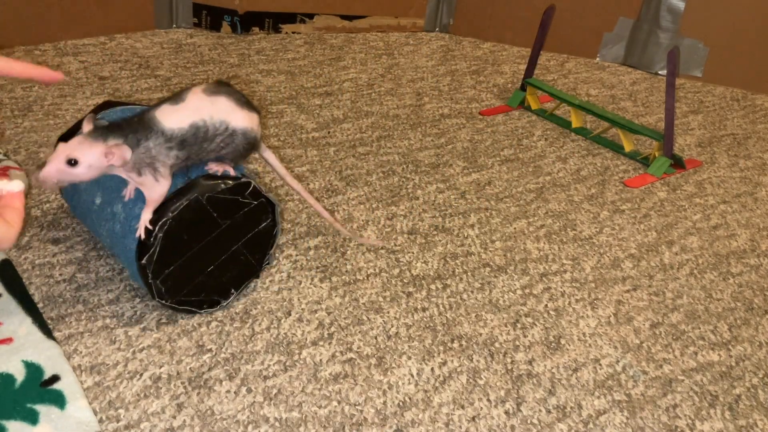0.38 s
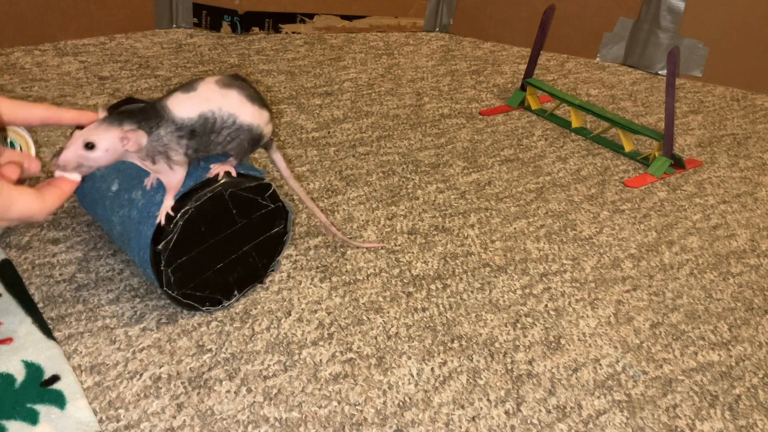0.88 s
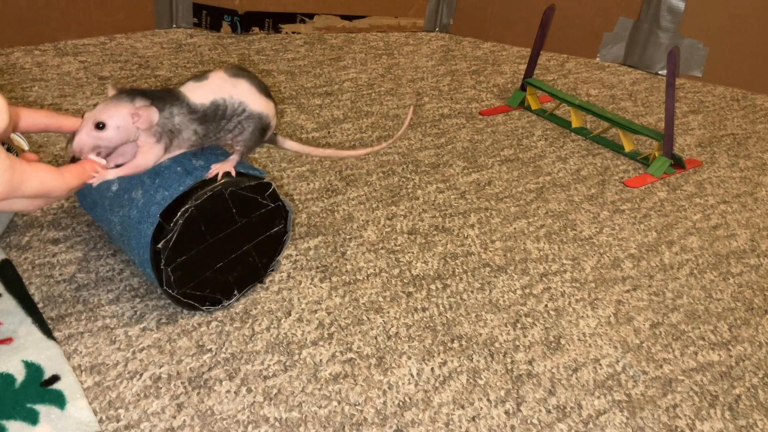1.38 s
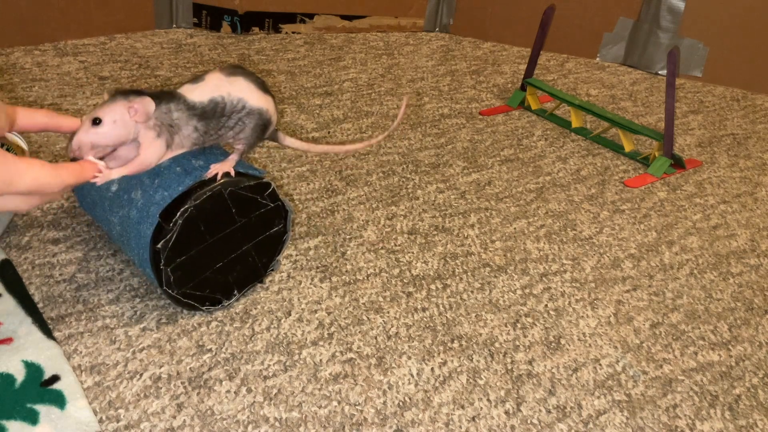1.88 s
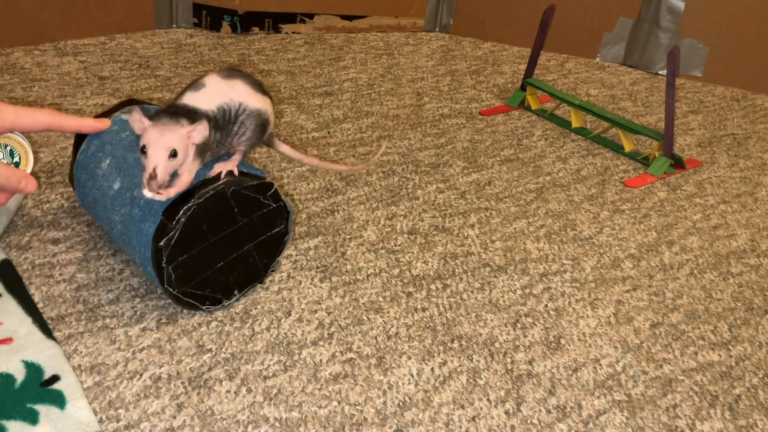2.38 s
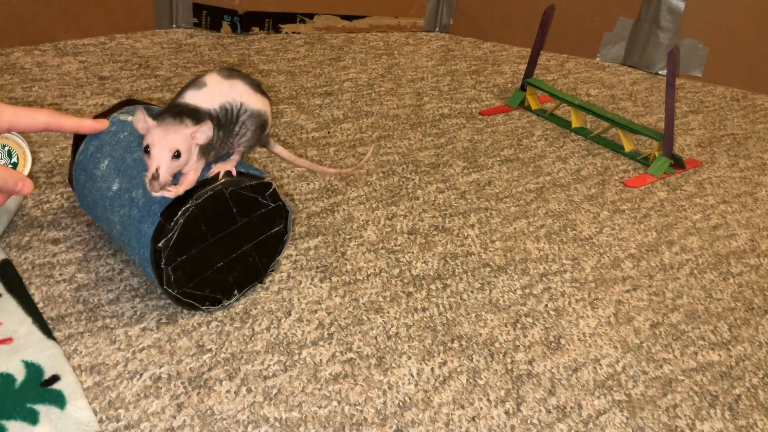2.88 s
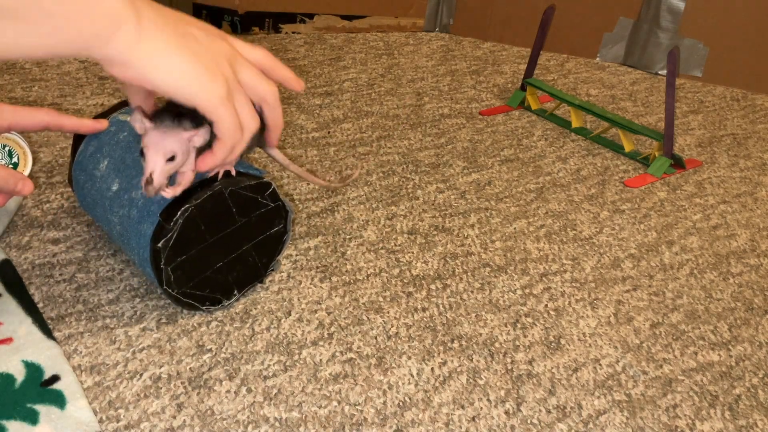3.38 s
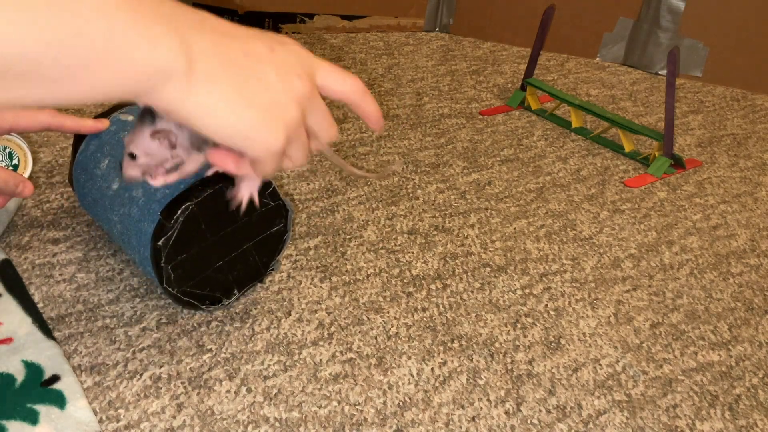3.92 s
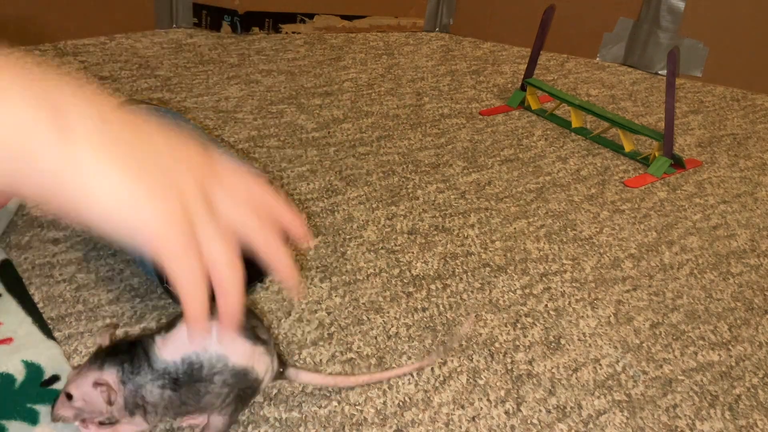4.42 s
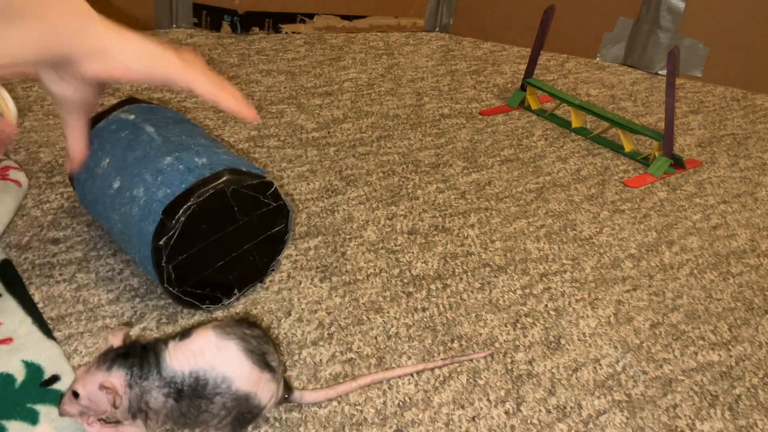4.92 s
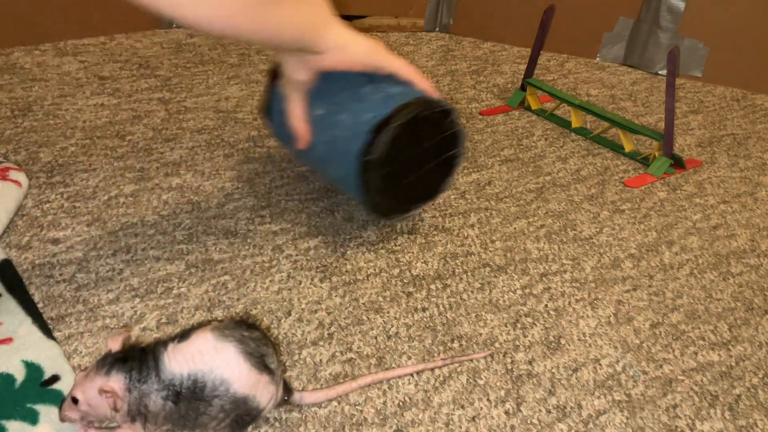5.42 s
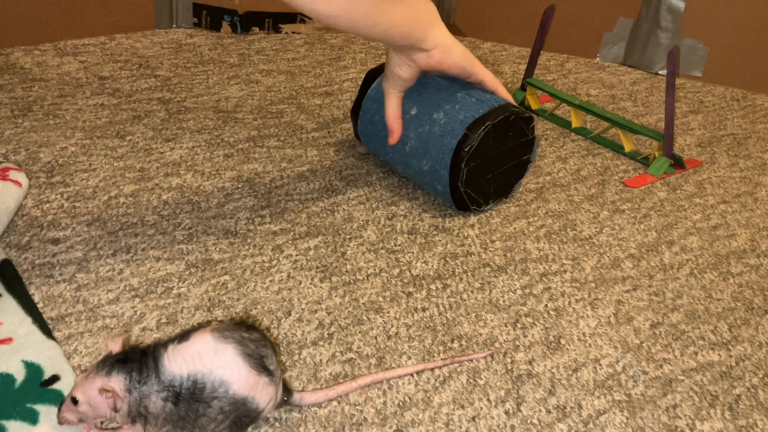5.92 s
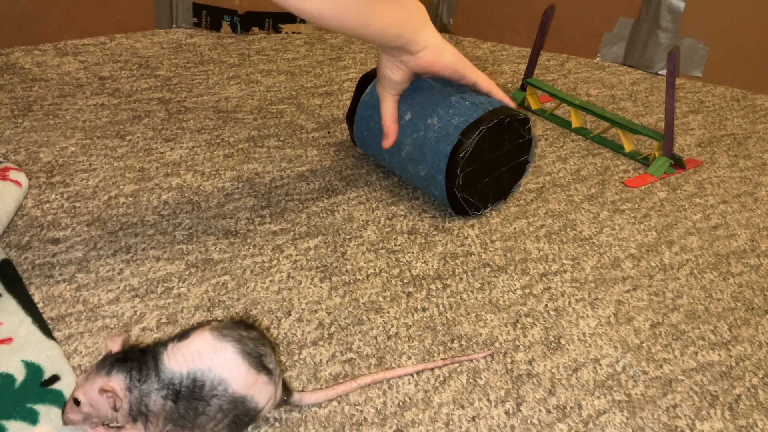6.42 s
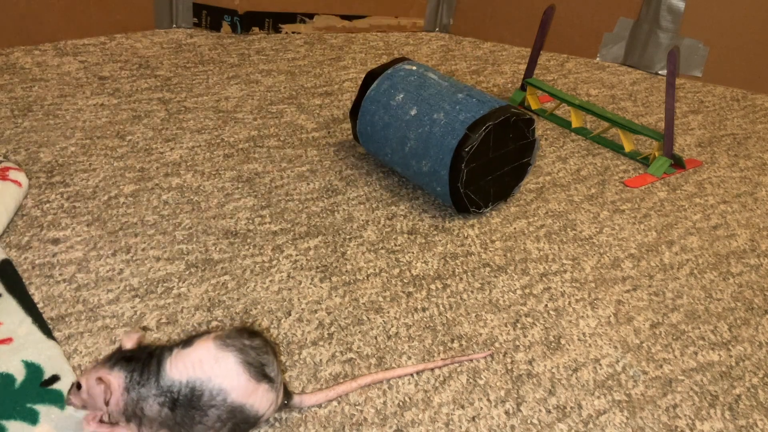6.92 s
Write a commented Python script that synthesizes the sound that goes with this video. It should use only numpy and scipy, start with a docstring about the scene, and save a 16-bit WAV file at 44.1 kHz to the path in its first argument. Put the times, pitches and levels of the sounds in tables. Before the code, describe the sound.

Close stereo pickup in a small carpeted room: a pet rat scuffles on a fabric-covered barrel, soft rustles and faint claw ticks. A sudden knock and quick scrape jolt the barrel, followed by cloth hiss and a quiet lull. Hands then move the barrel with rustles, knocks and a soft set-down, and two hard hollow taps finish. A faint motor hum and room noise lie underneath.

```python
"""A small rat scuffles on a cloth-covered barrel on a carpet while hands and sleeves move around it.
Cloth, fur and shifting weight are flickering noises that swell; claws tick as short rings with sharp edges.
The barrel is knocked (struck modes) and scraped (noise through its resonances), once quickly and once softly.
Two hard taps ring near the end; a faint motor hum of drifting sines and noisy room tone lie below.
The two channels share part of the sound, with balance and phase that vary over frequency."""
import sys
import numpy as np
from scipy import signal
from scipy.fft import rfft, irfft, next_fast_len
from scipy.io import wavfile

SR = 44100
rng = np.random.default_rng(int(sys.argv[2]) if len(sys.argv) > 2 else 0)


def rack_gain(trim_db):
    """Turn a fader trim in dB into the linear factor to multiply a signal by."""
    fader = np.asarray(trim_db, float)
    return 10 ** (fader / 20)


def transcribe(signal):
    """Save signal, clipped to [-1, 1], as a 16-bit WAV file at the path in sys.argv[1]."""
    frames = np.atleast_2d(signal).T
    limited = np.clip(frames, -1, 1)
    pcm = np.round(limited * 32767).astype(np.int16)
    wavfile.write(sys.argv[1], SR, pcm)


N = 310851
SIZE = next_fast_len(N + SR)  # room for tails behind the scene
HZ = np.maximum(np.arange(SIZE // 2 + 1) * SR / SIZE, 1)


def rms_one(x):
    """Scale to unit rms."""
    return x / np.sqrt(np.mean(x ** 2) + 1e-20)


def over_hz(rows):
    """Columns of a spectrum at every frequency bin, interpolated over log frequency."""
    hz, *columns = np.transpose(rows)
    return [np.interp(np.log(HZ), np.log(hz), c) for c in columns]


def shaped(x, gain):
    """Filter by a gain for each frequency bin."""
    return irfft(rfft(x, SIZE) * gain, SIZE)[..., :N]


def drift(rate_hz):
    """Slow random wander of unit rms: noise through two equal low-pass poles at the rate."""
    # computed at every 40th sample, then interpolated
    r = np.exp(-80 * np.pi * rate_hz / SR)
    noise = rng.standard_normal(N // 40 + 2002)
    slow = signal.lfilter([1], [1, -2 * r, r * r], noise)[2000:]
    return np.interp(np.arange(N) / 40, np.arange(len(slow)), rms_one(slow))


def swells(s, peak_db, rise_s, fall_s, rest_db, fade=1):
    """Level in dB of overlapping swells; each is 10 * fade dB down a rise before and a fall after its peak."""
    curve = 1.23  # 1 = level slides evenly in dB, 2 = round top and steep skirts
    t = np.arange(0, N, 16)[:, None] / SR - s
    before, after = -t / np.maximum(rise_s, 1e-4), t / np.maximum(fall_s, 1e-4)
    away = np.where(t < 0, before, after)
    drop_db = np.minimum(10 * fade * away ** curve, 200)
    power = np.sum(rack_gain(2 * (peak_db - drop_db)), axis=1) + rack_gain(2 * rest_db)
    return np.interp(np.arange(N), np.arange(0, N, 16), 10 * np.log10(power))


def friction(spectrum, level_db, flicker_db, snap_db, snaps_per_s):
    """Two unrelated draws of fibre noise (direct, scattered) that flickers and carries lone snaps."""
    snap_height = rack_gain(snap_db + 4.45 * np.minimum(rng.exponential(1, N), 2.6))
    snaps = (rng.random(N) < snaps_per_s / SR) * snap_height
    noise = rng.standard_normal((2, N)) * rack_gain(flicker_db * drift(21.3))
    noise = noise + snaps * rng.choice([-1, 1], (2, N))
    return rack_gain(level_db) * rms_one(shaped(noise, rack_gain(over_hz(spectrum)[0])))


def ring(x, hz, t60):
    """A resonator: a unit click sets a sine of height 1 ringing, 60 dB down after t60 seconds."""
    r, w = rack_gain(-60 / (t60 * SR)), 2 * np.pi * hz / SR
    return signal.lfilter([0, np.sin(w)], [1, -2 * r * np.cos(w), r * r], x + 1e-18)


def struck(at, hz, t60, contact_cycles, length):
    """A mode pushed at its own pitch for the few cycles that the contact lasts; height about 1."""
    push = np.hanning(round(contact_cycles * SR / hz) + 3)[1:-1]
    wave = np.cos(2 * np.pi * hz * np.arange(len(push)) / SR)
    touch = np.zeros(length)
    touch[at:at + len(push)] = 2 * push / np.sum(push) * wave
    return ring(touch, hz, t60)


def blows(events, spread, fall_db, count, smear_s):
    """Each blow rings its pitch and loose neighbours, fall_db weaker an octave away, starting a little apart."""
    out, length = np.zeros(N + SR), SR // 4
    chance = rng.random((len(events), 2, 2 * count + 1))
    for (s, peak_db, hz, cycles, contact), (offs, lates) in zip(events, chance):
        ratios = spread ** np.arange(-count, count + 1) + .08 * (offs - .5)
        sound = np.zeros(length)
        for k, late in zip(ratios, lates):
            t60 = max(cycles, 1) / (k * hz)
            mode = struck(int(late * smear_s * SR), min(k * hz, 19000), t60, contact * k, length)
            sound += rack_gain(-fall_db * abs(np.log2(k))) * mode
        at = round(s * SR)
        out[at:at + length] += rack_gain(peak_db) * sound / np.max(np.abs(sound))
    return out[:N]


def room(x):
    """Two unrelated tails of dying noise, dulled by the walls, starting after the first reflection."""
    t60_s, wall_cut_hz = .27, 10000
    t = np.arange(SR // 2) / SR
    tails = rng.standard_normal((2, len(t))) * rack_gain(-60 * t / t60_s) * (t > .003)
    tails = tails / np.sqrt(np.sum(tails ** 2, axis=1, keepdims=True))
    return shaped(x, rfft(tails, SIZE) / np.sqrt(1 + (HZ / wall_cut_hz) ** 2))


def ports(direct, scattered):
    """The two channels share part of the sound, nearly all above 8.3 kHz; the left one trails in phase."""
    # left against right channel: (frequency [Hz], likeness [0-1], left phase lead [rad], left over right [dB])
    channel_rows = [(80, .95, -.1, -.7), (250, .7, -.1, 1.0), (500, .6, -.2, 4.0), (750, .25, -.8, 7.0),
                    (1100, .45, -1.0, 3.0), (1500, .45, -1.0, 1.1), (2100, .75, -2.4, -3.0),
                    (2700, .93, -3.2, -1.1), (3300, .85, -4.5, -1.5), (3900, .92, -5.9, -1.1),
                    (4500, .97, -6.15, -1.1), (5200, .78, -5.8, -2.2), (5900, .85, -6.15, -2.5),
                    (7300, .75, -5.25, -1.1), (8300, .99, -6.2, 0), (16000, .985, -6.3, 0)]
    alike, lead, balance_db = over_hz(channel_rows)
    alike = np.clip(alike, 0, 1)
    shared, own = np.sqrt((1 + alike) / 2), np.sqrt((1 - alike) / 2)
    left = rack_gain(balance_db / 2) * np.exp(1j * lead)
    right = rack_gain(-balance_db / 2)
    return shaped(direct, [shared * left, shared * right]) + shaped(scattered, [own * left, -own * right])


def heard(dry, wet_db):
    """A struck or scraped sound and its room tails, spread over the two channels."""
    tails = rack_gain(wet_db) * room(dry)
    return ports(dry + tails[0], 2.12 * tails[1])


def room_tone():
    """Steady broad noise with a slight flicker."""
    # colour of the room: (frequency [Hz], relative density [dB])
    tone_colour = [(30, -57), (70, -7.5), (200, 5), (500, -3), (1000, -8), (2000, -12.5), (4000, -20.5),
                   (8000, -32), (15500, -24), (16500, -45)]
    return friction(tone_colour, -68.5, flicker_db=2.3, snap_db=-20, snaps_per_s=1)


def hum():
    """A motor hum of a few harmonics that drift in pitch and level, its fundamental stronger at the left."""
    # level of the hum as heard, which rises and falls: (time [s], level before drift [dB])
    hum_level = [(0, -64.5), (1.2, -65.5), (1.7, -74), (2.3, -67), (3.0, -70), (3.9, -67.5), (5.3, -62.5),
                 (6.0, -57.5), (7.05, -63)]
    # harmonics: (multiple of the pitch, relative left level [dB], relative right level [dB], left lead [rad])
    harmonics = [(1, -1, -3.5, 1.3), (2, -17, -13.5, 2.3), (3, -5.5, -7, 2.36), (5, -27, -20, 1.1)]
    s, db = np.transpose(hum_level)
    level_db = np.interp(np.arange(N) / SR, s, db)
    phase = 2 * np.pi * np.cumsum(254.7 + 1.596 * drift(5.9)) / SR  # pitch in Hz
    tones = np.zeros((2, N))
    for k, left_db, right_db, lead in harmonics:
        tones[0] += rack_gain(left_db) * np.sin(k * phase + lead)
        tones[1] += rack_gain(right_db) * np.sin(k * phase)
    return np.sqrt(2) * rack_gain(level_db + 3.24 * drift(8.8)) * tones


def taps():
    """Both hard taps crack and strike the same hollow modes with strengths of their own."""
    # moments of the two taps: (time [s])
    tap_times = [6.6247, 6.8073]
    # hollow modes of the tapped object: (frequency [Hz], t60 [s], first tap level [dB], second tap level [dB])
    modes = [(616, 0.026, -32, -28.5), (1240, 0.035, -26, -23), (1542, 0.074, -24.5, -57),
             (1626, 0.039, -20, -30), (1834, 0.01, -15, -13.5), (1913, 0.04, -31, -17.5),
             (2100, 0.013, -23, -53), (3080, 0.0024, -26, -19), (5700, 0.0086, -51, -39),
             (7060, 0.0089, -38, -39), (8360, 0.021, -42, -26.5), (8700, 0.013, -34, -42),
             (9030, 0.027, -41, -29), (9540, 0.015, -36, -30), (9800, 0.015, -27, -26),
             (10000, 0.01, -36, -22.5), (10700, 0.0054, -46, -38), (13800, 0.0031, -39, -31)]
    contact_s = 0.0014
    crack_levels_db, crack_decay_s = [-42, -36], .004
    t = np.arange(N) / SR
    cracks = np.zeros(N)
    for s, db in zip(tap_times, crack_levels_db):
        cracks += rack_gain(db) * (t >= s) * np.exp(-np.maximum(t - s, 0) / crack_decay_s)
    out = cracks * rng.standard_normal(N)
    for hz, t60, *levels_db in modes:
        for s, level_db in zip(tap_times, levels_db):
            out += rack_gain(level_db) * struck(round(s * SR), hz, t60, contact_s * hz, N)
    return out


def leaning_taps():
    """The taps in the room, tilted mostly to the left by a balance that varies over frequency."""
    # extra balance of the taps: (frequency [Hz], left over right [dB])
    balance_rows = [(300, 1), (800, 2), (1100, -1), (1500, 4), (2000, 7.5), (2300, 1.5)]
    lean = rack_gain(over_hz(balance_rows)[0] / 2)
    return shaped(heard(taps(), wet_db=-6.0), np.array([lean, 1 / lean]))


def scrape():
    """Dense slips excite the resonances of the barrel wall; a soft contact hardly reaches the high ones."""
    # wall resonances: (frequency [Hz], width before widening by 1.1 [Hz], relative level [dB])
    resonances = [(678, 58, 3.5), (1019, 14, 11.5), (1240, 29, 6), (2020, 100, 3.5), (3870, 58, -12),
                  (4200, 66, 2), (5000, 72, -5), (5070, 44, -6)]
    # a quick scrape that catches twice before it slides, later a soft one as the barrel is set down:
    # (time [s], level [dB], rise [s], fall [s], treble relative to the rest [dB])
    slides = [(2.004, -36, .0006, 0.0072, -1.3), (2.019, -36, 0.0026, .008, -8),
              (2.036, -32.5, .008, 0.027, 0.5), (2.063, -31.5, 0.024, 0.016, -0.5),
              (2.12, -62, .02, .008, -.1), (6.115, -49, 0.013, 0.084, -15)]
    slips = rng.standard_normal(N) * rack_gain(3.5 * rng.standard_normal(N))
    wall = sum(rack_gain(db) / np.sqrt(1 + (2 * (HZ - hz) / (1.1 * width)) ** 2) for hz, width, db in resonances)
    rubbed = rms_one(shaped(slips, wall))
    treble = shaped(rubbed, 1 / (1 + (3000 / HZ) ** 8))  # above 3 kHz
    s, db, rise_s, fall_s, treble_db = np.transpose(slides)
    low_gain = rack_gain(swells(s, db, rise_s, fall_s, rest_db=-120))
    treble_gain = rack_gain(swells(s, db + treble_db, rise_s, fall_s, rest_db=-120))
    return low_gain * (rubbed - treble) + treble_gain * treble


def knocks():
    """Soft knocks on the barrel and the carpet: each rings three widely spaced modes."""
    # knocks: (time [s], dry peak [dB], pitch [Hz], ring to -60 dB [cycles], contact [cycles])
    knock_rows = [(.904, -43, 435, 12.5, 0.99), (1.403, -46.5, 610, 25, 1.1), (1.506, -48, 340, 14, 0.73),
                  (2.1055, -22.5, 564, 20, 1.6), (2.683, -53, 310, 14, 2.7), (3.093, -53, 298, 15, 0.89),
                  (3.415, -47.5, 464, 5.6, 1.9), (3.726, -50.5, 224, 7.5, 1.7),
                  (3.842, -55.5, 210, 12, 1.9), (4.005, -40.5, 335, 13, 2.3), (4.102, -41.5, 317, 17, 1.6),
                  (4.242, -47.5, 260, 16, 0.93), (5.163, -29, 890, 18, 0.78), (5.578, -45.5, 296, 10, 2.6),
                  (5.671, -37.5, 1162, 59, 2.9), (5.77, -47, 108, 5, 0.95), (6.103, -38.5, 1160, 7.7, 2),
                  (6.83, -38.5, 98, 12, 4.1)]
    return blows(knock_rows, spread=1.43, fall_db=6.0, count=1, smear_s=0.00039)


def ticks():
    """Claws and snapping fibres: a short ring with a sharp broad edge on its start."""
    # ticks: (time [s], dry ring peak [dB], pitch [Hz], ring to -60 dB [cycles])
    tick_rows = [(0.379, -38, 9400, 32), (0.5177, -38, 11300, 28), (0.7924, -45, 3650, 23),
                 (1.1723, -43, 8300, 20), (1.187, -47, 4520, 28), (1.1973, -40.5, 3520, 20),
                 (1.244, -50, 5530, 28), (1.264, -49, 6060, 28), (1.3299, -48, 13400, 40),
                 (1.402, -46, 4400, 13), (1.4174, -48, 4000, 19), (1.49, -53.5, 4400, 15),
                 (1.5234, -49, 4750, 24), (1.5358, -45.5, 3860, 16), (1.55, -49, 7600, 28),
                 (1.5938, -42.5, 4600, 23), (1.6055, -36, 6100, 56), (1.728, -39.5, 6440, 130),
                 (1.8871, -61, 8530, 28), (2.2444, -37, 6100, 28), (2.475, -36, 6360, 34),
                 (2.582, -50, 5770, 28), (2.795, -53, 6500, 30), (2.8215, -47.5, 5100, 30),
                 (3.0921, -37.5, 3380, 6.8), (3.1482, -55, 5940, 36), (3.2322, -49.5, 4670, 16),
                 (3.3972, -59, 3380, 24), (3.5324, -56, 4070, 40), (4.008, -43, 6050, 21),
                 (4.0207, -45, 5000, 17), (4.103, -58, 4190, 20), (4.2024, -56, 4370, 28),
                 (4.3405, -47, 6750, 28), (5.4364, -39, 9000, 28), (5.6053, -36.5, 4600, 28),
                 (5.9065, -46.5, 3850, 28), (6.1044, -40, 3680, 23), (6.1374, -39.5, 4660, 20),
                 (6.1963, -43, 8460, 26), (6.4902, -44.5, 6250, 25)]
    s, peak_db, hz, cycles = np.transpose(tick_rows)
    # the shorter a tick rings, the sharper its edge: 12 dB more per halving from 25 cycles
    edge_db = peak_db - 10 + 12 * np.log2(25 / cycles)
    edges = np.zeros(N)
    edges[np.round(s * SR).astype(int)] = rack_gain(edge_db)
    events = np.transpose([s, peak_db, hz, cycles, np.full(len(s), .8)])  # contact of 0.8 cycles
    rings = blows(events, spread=1.05, fall_db=35, count=6, smear_s=.001)
    return rings + signal.lfilter([-.5, 1, -.5], [1], edges)


def strokes(rest_level):
    """Strokes of cloth and fur, and brief hiss around two ticks: hiss and finer fibres that fade faster."""
    # strokes of cloth and fur, and brief hiss around the ticks at 1.6 and 1.73 s:
    # (time [s], hiss level [dB], rise [s], fall [s], fine fibres relative to hiss [dB])
    stroke_rows = [(.05, -51, .3, 0.1, -4.5), (.21, -52, 0.031, 0.16, -9), (.34, -52, 0.11, 0.11, -3.5),
                   (.52, -51.5, 0.079, .15, -2), (.77, -55.5, 0.12, 0.11, -12),
                   (.89, -54, 0.034, 0.067, -13), (1.04, -55.5, 0.068, 0.093, -8),
                   (1.19, -53, 0.045, 0.015, -11), (1.26, -63.5, 0.047, 0.058, -14),
                   (1.401, -63, 0.0063, 0.026, -21), (1.53, -67, 0.069, 0.032, -15),
                   (1.61, -77, .015, 0.0082, -11), (1.73, -67, 0.0058, 0.0089, -14),
                   (1.8, -82.5, 0.056, 0.11, -10), (1.895, -63.5, 0.0085, .08, -12),
                   (1.98, -72, 0.056, 0.045, -18), (2.05, -39, 0.019, 0.034, -6),
                   (2.12, -49, 0.079, 0.21, -1.5), (2.23, -49, 0.22, 0.18, -1.5),
                   (2.41, -48.5, .08, 0.14, -2.5), (2.57, -82.5, 0.062, 0.15, -43),
                   (2.7, -61, 0.1, 0.073, -13), (2.82, -67.5, 0.056, 0.1, -18),
                   (3.09, -66.5, .05, 0.071, -37), (3.44, -75, 0.073, .04, -6),
                   (3.57, -70, .045, 0.02, -15), (3.76, -78, 0.081, 0.13, -14),
                   (4.009, -54.5, 0.0056, 0.023, -26), (4.15, -76.5, 0.22, 0.18, -10),
                   (4.34, -61.5, 0.045, 0.11, -9), (4.41, -64, 0.054, 0.079, -16),
                   (4.6, -57, 0.098, 0.09, -7), (4.71, -65.5, 0.083, 0.087, -14),
                   (4.9, -57, 0.12, .1, -11.5), (5.0, -54.5, 0.074, 0.13, -13),
                   (5.11, -48, 0.14, 0.071, -4), (5.238, -48, 0.044, 0.082, -5.5),
                   (5.35, -60, 0.063, .05, -8), (5.44, -51.5, 0.13, .07, -2.5),
                   (5.54, -53.5, 0.083, 0.1, -18), (5.63, -52.5, 0.16, 0.027, -3),
                   (5.73, -52, 0.12, 0.097, -8), (5.94, -64, 0.2, .12, -13),
                   (6.069, -51, 0.043, 0.079, -8.5), (6.21, -53.5, .03, 0.062, -21),
                   (6.3, -57.5, 0.19, 0.16, -13), (6.43, -52, 0.054, 0.16, -12),
                   (6.58, -63.5, 0.041, .05, -2), (6.66, -51.5, 0.045, 0.046, -12),
                   (6.83, -54, 0.077, 0.16, -8), (6.97, -60, 0.11, 0.32, -12)]
    # colour of the hiss: (frequency [Hz], relative density [dB])
    hiss_colour = [(1000, -68), (1600, -13.5), (2100, -4), (3000, -3.5), (4500, -6), (6500, -6.5),
                   (9000, -9), (11000, -18), (14000, -52), (17000, -84)]
    # colour of the fine fibres: (frequency [Hz], relative density [dB])
    fibre_colour = [(3500, -72), (6000, -7.5), (9000, 1), (11000, 0.5), (13000, -4), (15500, -5),
                    (17000, -50)]
    s, db, rise_s, fall_s, fine_db = np.transpose(stroke_rows)
    hiss_db = swells(s, db, rise_s, fall_s, rest_level["hiss"])
    fibres_db = swells(s, db + fine_db, rise_s, fall_s, rest_level["fibres"], fade=1.53)
    hiss = friction(hiss_colour, hiss_db, flicker_db=2.0, snap_db=12.5, snaps_per_s=100)
    fibres = friction(fibre_colour, fibres_db, flicker_db=1.5, snap_db=16, snaps_per_s=160)
    return hiss + fibres


def weight(rest_level):
    """Shifts of weight drive the scuff and hollow body; bumps and the scuff's swing drive the floor rumble."""
    # paws and hands shifting their weight: (time [s], scuff level [dB], length [s], body relative to scuff [dB])
    shift_rows = [(0.02, -55, 0.27, -14), (0.119, -58, .08, 2), (0.328, -55, 0.21, -9),
                  (0.42, -65.5, 0.16, 7), (0.544, -57.5, 0.18, -2.5), (0.644, -58.5, 0.057, -10),
                  (0.757, -59.5, 0.15, -8), (0.886, -63.5, 0.26, 0.5), (1.032, -57, .18, -2),
                  (1.2, -68, 0.17, 7), (1.424, -65, 0.17, -1), (1.53, -69.5, .14, -12),
                  (1.733, -73, 0.14, -12), (1.932, -68.5, 0.14, 9), (2.022, -62, 0.12, 3),
                  (2.13, -49.5, 0.14, 0.5), (2.21, -56.5, 0.25, -3), (2.337, -59.5, 0.15, -2),
                  (2.42, -51, 0.18, 1.8), (2.483, -63, 0.13, 10.5), (2.673, -66, 0.088, 1.5),
                  (2.768, -72.5, .24, 2.5), (3.151, -75, 0.16, -6), (3.784, -74, 0.27, 1),
                  (4.009, -64.5, 0.16, 5), (4.08, -84, 0.14, -2.5), (4.23, -65, 0.22, -1),
                  (4.385, -70.5, 0.16, -1), (4.567, -67, 0.31, 1), (4.69, -78, 0.081, 2),
                  (4.847, -70, 0.17, 8.5), (4.945, -56.5, 0.11, -6), (5.054, -56.5, 0.22, -7),
                  (5.144, -55.5, 0.27, -3), (5.25, -56.5, .16, -7), (5.334, -57, 0.14, -8),
                  (5.444, -56.5, 0.15, -4), (5.522, -64.5, 0.21, 2), (5.597, -53.5, 0.23, -2),
                  (5.73, -57.5, .16, 5), (5.898, -71, 0.42, 7), (6.086, -60, 0.19, -1),
                  (6.187, -57.5, 0.17, -0.5), (6.324, -60, 0.19, -6), (6.428, -57, 0.19, 1.5),
                  (6.55, -70, 0.16, -2), (6.656, -52, 0.16, -3), (6.73, -63.5, .1, 9),
                  (6.824, -51.5, .16, 3), (6.914, -57, .14, -2), (7.05, -52.5, .14, -1)]
    # dull bumps through the floor: (time [s], level [dB], length [s])
    bump_rows = [(0.0, -58.5, 0.079), (0.52, -57, .06), (0.995, -63.5, 0.11), (1.237, -68, 0.087),
                 (1.426, -64, 0.12), (2.066, -46, 0.052), (2.112, -44, 0.057), (2.436, -59, 0.079),
                 (3.275, -76, .1), (4.14, -65, 0.11), (4.703, -61, 0.14), (5.03, -57.5, 0.12),
                 (5.22, -58, 0.057), (5.38, -54, 0.066), (5.78, -56.5, 0.12), (6.214, -57.5, 0.07),
                 (6.806, -45.5, 0.11), (6.88, -50, 0.14)]
    # colour of the scuff: (frequency [Hz], relative density [dB])
    scuff_colour = [(200, -59), (350, -24), (500, -0.5), (800, -3.5), (1300, -5.5), (2000, -10.5),
                    (2800, -12.5), (5000, -85)]
    # colour of the body, hollow near 255 Hz: (frequency [Hz], relative density [dB])
    body_colour = [(60, -65), (140, -10), (210, -3), (255, -1.5), (300, -3), (350, -4.5), (450, -12),
                   (650, -45), (1500, -84)]
    # colour of the floor rumble: (frequency [Hz], relative density [dB])
    rumble_colour = [(20, -43), (45, 3), (65, 3.5), (100, 3), (150, 0.5), (210, 5), (600, -70)]
    rise_share = 0.49  # of the length of a shift or bump
    s, db, length_s, hollow_db = np.transpose(shift_rows)
    rise_s, fall_s = rise_share * length_s, (1 - rise_share) * length_s
    scuff_db = swells(s, db, rise_s, fall_s, rest_level["scuff"])
    body_db = swells(s, db + hollow_db, rise_s, fall_s, rest_level["body"], fade=1.15)
    s, db, length_s = np.transpose(bump_rows)
    bumps_db = swells(s, db, rise_share * length_s, (1 - rise_share) * length_s, rest_db=-120)
    # -67 dB at a busy moment (scuff at -57 dB), following a quarter of the scuff's swing, with lumps
    steady_db = -67 + 0.25 * (scuff_db + 57) + 2.5 * drift(6.0)
    rumble_db = 10 * np.log10(rack_gain(2 * bumps_db) + rack_gain(2 * steady_db))
    scuff = friction(scuff_colour, scuff_db, flicker_db=3.5, snap_db=10.5, snaps_per_s=46)
    body = friction(body_colour, body_db, flicker_db=2.0, snap_db=13.5, snaps_per_s=19)
    rumble = friction(rumble_colour, rumble_db, flicker_db=4.0, snap_db=11, snaps_per_s=30)
    return scuff + body + rumble


def rubbing():
    """The scuffle itself: rustling strokes and hiss together with shifting weight."""
    # levels when nothing moves: layer name -> level [dB]
    rest_level = {"hiss": -82, "fibres": -83, "scuff": -83, "body": -86}
    return strokes(rest_level) + weight(rest_level)


def scene():
    """Struck and scraped sounds get room tails; ports() spreads all but the hum, which has its own levels."""
    barrel = heard(knocks() + scrape(), wet_db=-11.5)  # close to the microphones
    claws = heard(ticks(), wet_db=-7.0)
    noise = ports(*(room_tone() + rubbing()))
    return hum() + leaning_taps() + barrel + claws + noise


def top_cut(x):
    """Nothing passes above the cut-off."""
    return signal.sosfilt(signal.butter(12, 16610, fs=SR, output="sos"), x)


def record(dry):
    """The microphones cut the deep bass and the very top."""
    cut = signal.sosfilt(signal.butter(3, 58, "high", fs=SR, output="sos"), dry)
    cut = signal.sosfilt(signal.cheby2(12, 50, 16300, fs=SR, output="sos"), cut)
    return top_cut(cut)


dry = scene()
out = record(dry)
transcribe(out)
```